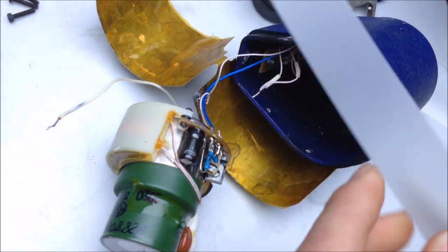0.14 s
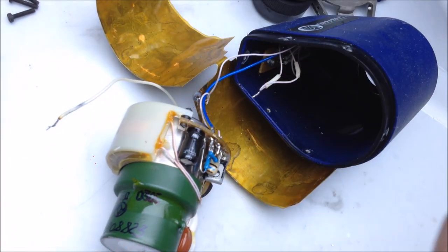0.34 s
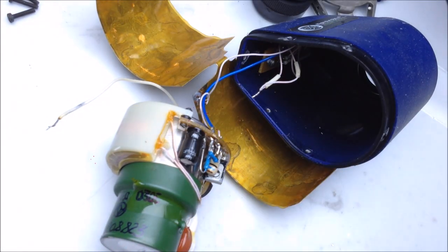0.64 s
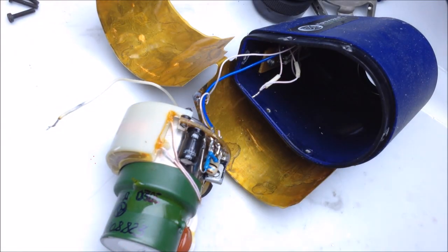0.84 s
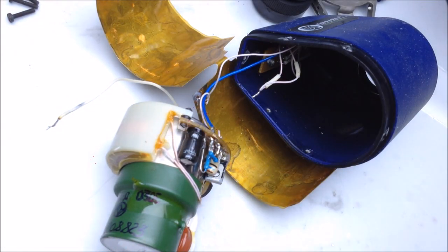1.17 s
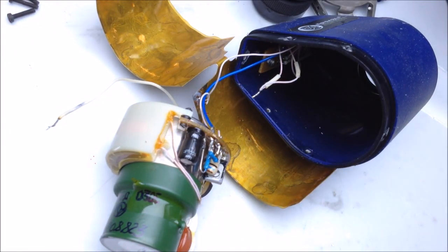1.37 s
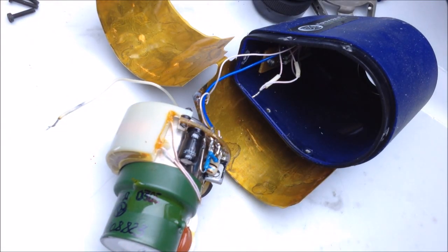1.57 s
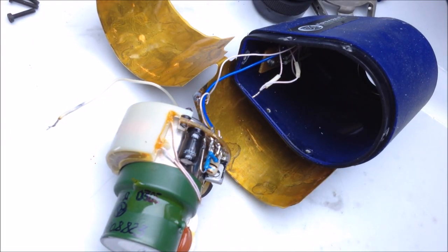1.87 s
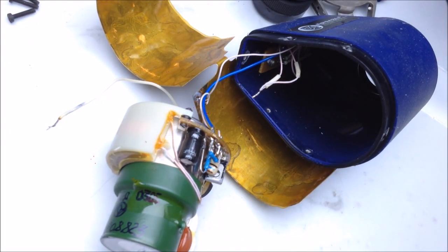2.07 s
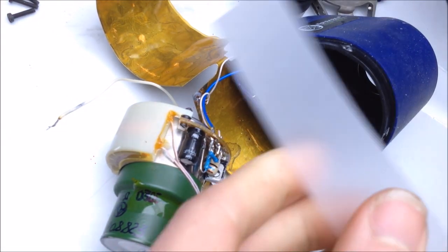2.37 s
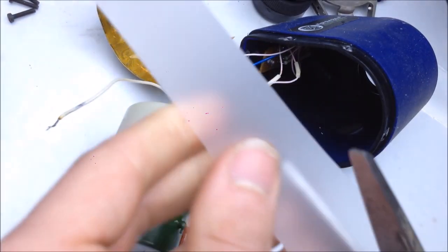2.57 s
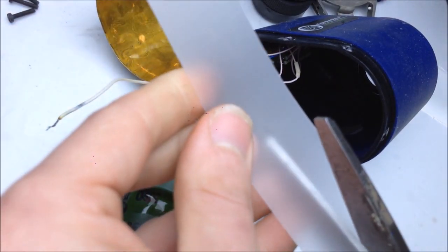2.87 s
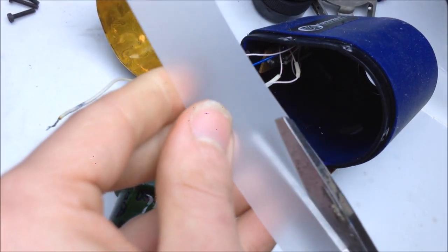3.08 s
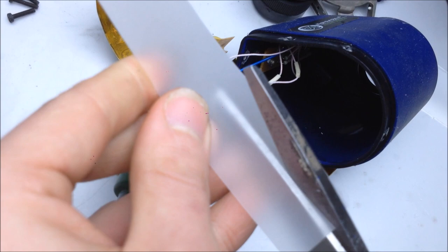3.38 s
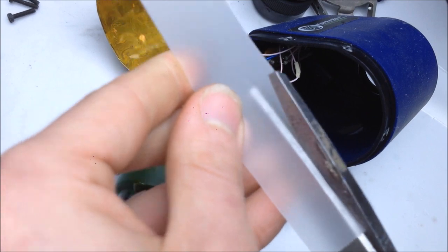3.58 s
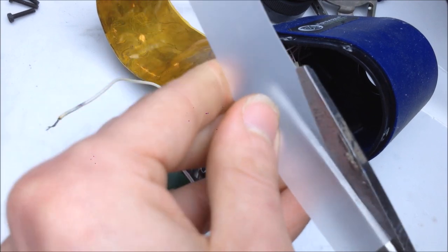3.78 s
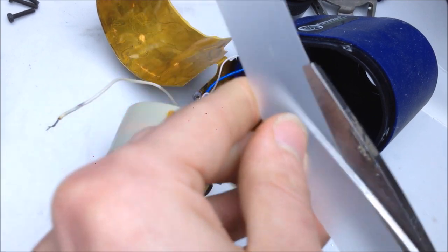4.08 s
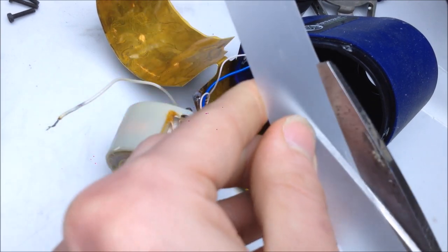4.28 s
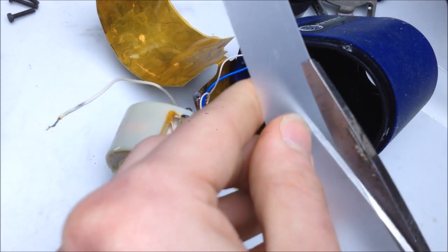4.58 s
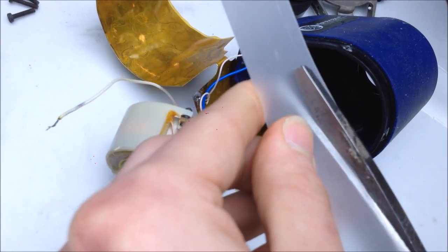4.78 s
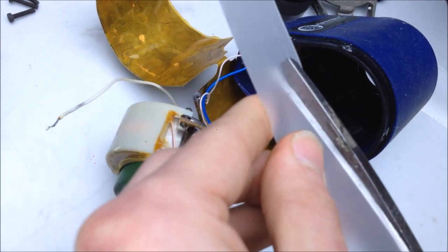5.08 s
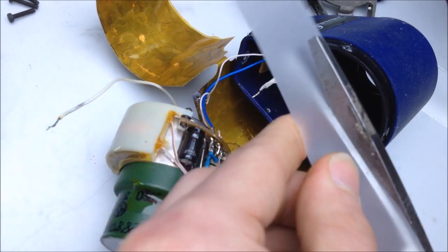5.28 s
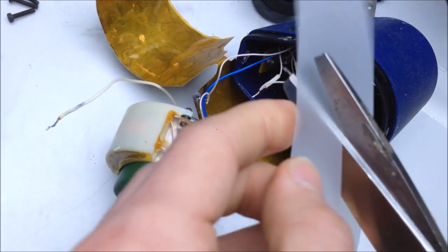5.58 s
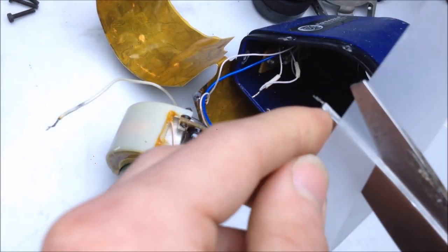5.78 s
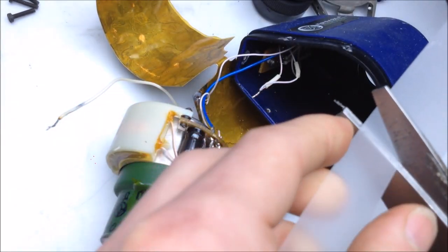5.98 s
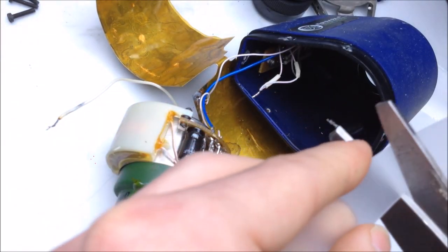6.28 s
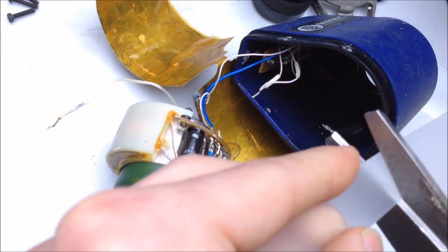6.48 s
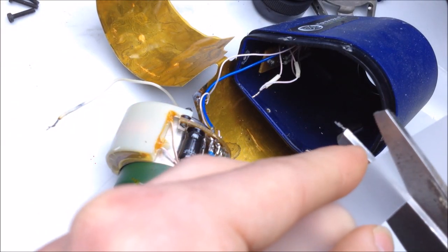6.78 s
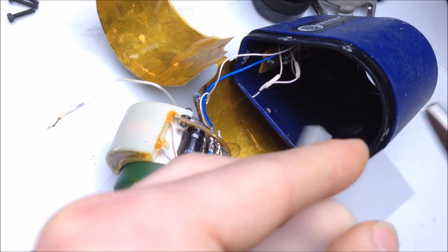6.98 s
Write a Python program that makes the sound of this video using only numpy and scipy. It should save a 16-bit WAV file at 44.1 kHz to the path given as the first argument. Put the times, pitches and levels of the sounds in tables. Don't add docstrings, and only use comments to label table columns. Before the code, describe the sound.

A tiny clipped snap, then over two seconds of quiet room with faint finger rustles, a soft fan drone and thin electrical whine. Scissors then crunch through stiff plastic in uneven clusters of bright dry cracks and gritty shear, with one hard snap near the end of the run. Light rustling follows, then a final burst of sharp snaps with a brief rough flutter. Close microphone over a workbench, dry.

```python
import sys
import numpy as np
from scipy import signal
from scipy.fft import rfft, irfft, next_fast_len
from scipy.io import wavfile
from scipy.ndimage import uniform_filter1d, map_coordinates

SR = 44100
rng = np.random.default_rng(int(sys.argv[2]) if len(sys.argv) > 2 else 0)


def gain_from_db(level_db):
    decades = np.asarray(level_db, float) / 20
    return 10 ** decades


def int16_out(signal):
    q = np.round(np.clip(np.atleast_2d(signal).T, -1, 1) * 32767)
    wavfile.write(sys.argv[1], SR, q.astype(np.int16))


N = 315030
TIME = np.arange(N) / SR
TOP_HZ = 15230

# f/Hz, width/Hz, level/dB
SHEET = [(425, 200, -9), (710, 54, 6), (845, 63, 5.5), (982, 200, 6), (1470, 640, -6.5)]
BLADES = [(2260, 750, -4.5), (2800, 410, 0.5), (4400, 360, -0.5), (5720, 380, -3), (6400, 690, -2.5),
          (7460, 720, -3), (8700, 1300, -8)]
EDGE = [(9320, 3200, -1), (11900, 500, -2), (12700, 880, -2), (13460, 2000, -6.5)]

# t/s, rms level/dB, sheet level/dB, edge level/dB,
# brightest f/Hz
SLIPS = [(0.0030, -35, -3, -1, 5100), (2.9859, -38, -0.5, 3, 3670), (3.0335, -35, 1, -2, 4030),
         (3.0690, -36, 0, -1.5, 4200), (3.0978, -25.5, 0, -5, 3960), (3.1298, -29.5, 0, -9, 4250),
         (3.3237, -30.5, 4, -33, 6040), (3.3438, -34, 1.5, -27.5, 4400),
         (3.3598, -29, -2.5, -24, 4400), (3.4790, -36, -0.5, -3, 4260), (3.5060, -26.5, -3, -6, 4330),
         (3.5358, -24, -5.5, -25, 4630), (3.5790, -27.5, -4.5, -11.5, 5470),
         (3.7484, -37.5, 3.5, -25, 2800), (3.9066, -35, 2.5, -1, 2150),
         (3.9303, -32.5, -3.5, -8, 5630), (3.9490, -31.5, -1, -4, 6940), (3.9737, -37, -16, -13, 1820),
         (3.9895, -35.5, -4.5, -5.5, 3800),
         (4.1293, -30, -8, -33, 2600), (4.1663, -33, 3.5, -23, 2800), (4.1947, -33, -7, -19.5, 6400),
               (4.2151, -31, -3, -21, 7100), (4.3266, -23, -8, -24.5, 7200), (4.3426, -40, -4, -16.5, 6340),
               (4.4280, -36, 5, -14.5, 6540), (4.6531, -34.5, -7, -4.5, 6400),
               (4.6649, -45.5, -11, -11, 6400), (4.68, -32.5, 2.5, -3.5, 8800),
               (4.7089, -36, 6, -4.5, 4700), (4.7244, -37, -1.5, -10, 4700), (4.7470, -33, -1, -1.5, 2640),
               (4.7673, -30, -6, -8, 4500), (4.9656, -36, -1, -27, 6350),
         (5.0570, -31, -4, -3.5, 2370), (5.0820, -29.5, 7.5, -7, 2340), (5.1065, -37.5, -3, -6.5, 4400),
             (5.143, -27.5, -2.5, -7, 4400), (5.1762, -34.5, -11, -1, 4500), (5.2990, -41, 4, -16, 4500),
             (5.3275, -26, -5, -8, 2900), (5.3805, -14.5, -7.5, -20.5, 4770), (5.7525, -45, 2, -2.5, 4640),
             (6.8, -35, -12.5, -9, 5690), (6.9270, -15, -17.5, -3, 4130), (6.9530, -21, -8, -1, 4350),
             (6.9745, -25, -7, -26, 8700), (7.0450, -34.5, -1, 2, 6000), (7.0677, -40.5, 2, -24, 1780),
             (7.0842, -38, -4, -3, 9100)]
CUTS = SLIPS


def columns(rows):
    return np.transpose(rows)[:, :, None]


def unit(x):
    return x / np.sqrt(np.mean(x ** 2) + 1e-20)


def energy(x):
    return np.linalg.norm(x, axis=1, keepdims=True)


def with_energy(x, db, size):
    return x * gain_from_db(db) / energy(x) * size


def with_peak(x, db):
    return x * gain_from_db(db) / np.abs(x).max(1, keepdims=True)


def along(points, hz):
    f, v = np.transpose(points)
    return np.interp(np.log(hz + 1), np.log(f + 1), v)


def gain(s, db):
    return uniform_filter1d(np.interp(TIME, s, gain_from_db(db), 0, 0), size=200)


def wobble(rate):
    coarse = np.arange(0, N + 16, 16)
    knots = rng.standard_normal(int(N * rate / SR) + 4)
    return np.interp(np.arange(N), coarse, map_coordinates(knots, [coarse * rate / SR]))


def filtered(x, response):
    m = next_fast_len(x.shape[-1] + 256)
    return irfft(rfft(x, m) * response(np.fft.rfftfreq(m, 1 / SR)), m)[..., :x.shape[-1]]


def bass_cut(x, corner_hz):
    return filtered(x, lambda f: (1j * f / (corner_hz + 1j * f)) ** 2)


def dulled(x, hz):
    return filtered(x, lambda f: 1 / (1 + 1.4j * f / hz - (f / hz) ** 2))


def bandpass(f, hz, width):
    return 1j * f * width / (hz * hz - f * f + 1j * f * width)


def spot(x, hz, width_hz):
    return filtered(x, lambda f: bandpass(f, hz, width_hz))


def resonate(x, modes, spread_db=0):
    hz, width, db = columns(modes)
    sign = (-1) ** np.arange(len(modes))
    spread = spread_db * rng.standard_normal((*x.shape[:-1], len(modes)))
    strength = sign * gain_from_db(db[:, 0] + spread)
    return filtered(x, lambda f: strength @ bandpass(f, hz, width))


def grit(shape, spiky_db):
    return rng.standard_normal(shape) * gain_from_db(spiky_db * np.minimum(rng.exponential(size=shape), 4))


def echoed(x, wet_db):
    # f/Hz, t60/s
    bench = [(250, 0.19), (800, 0.055), (2000, 0.067), (6000, 0.052), (14000, 0.1)]
    hz, t, z = signal.stft(rng.standard_normal(x.shape), SR, nperseg=128)
    decay = gain_from_db(-60 * t / along(bench, hz)[:, None])
    echo = signal.istft(z * decay, SR, nperseg=128)[1][:, :x.shape[1]]
    echo /= energy(echo)
    return x + gain_from_db(wet_db) * signal.fftconvolve(x, echo, axes=1)[:, :x.shape[1]]


def swells(s, rise, fall, spiky_db, wet_db, span, sudden):
    t = np.arange(round(span * SR)) / SR - span / 3
    swell = np.where(t < 0, np.exp(-.5 * np.abs(t / rise) ** sudden), np.exp(-.55 * t / fall))
    return echoed(grit(swell.shape, spiky_db) * swell, wet_db), energy(swell), s - span / 3


def placed(rows, s):
    at = np.round(s * SR).astype(int) + np.arange(rows.shape[1])
    inside = (at >= 0) & (at < N)
    return np.bincount(at[inside], rows[inside], N)


def slips():
    s, db, sheet_db, edge_db, hz = columns(CUTS)
    peak_s = s + .0025
    rise = .0026 * gain_from_db(0.41 * (-33 - db))
    fall = 0.003 * gain_from_db(.25 * np.minimum(-25 - db, 0))
    push, size, start = swells(peak_s, rise, fall, spiky_db=4.5, wet_db=-9.0, span=.105, sudden=3.5)
    steel = resonate(push, BLADES, spread_db=3.5) + gain_from_db(-6.0) * spot(push, hz, 700)
    steel = with_energy(dulled(steel, 10500), db, size)
    sheet = with_energy(resonate(push, SHEET, spread_db=3.0), db + sheet_db - 3.5, size)
    edge = with_energy(resonate(push, EDGE, spread_db=5), db + edge_db + 0.5, size)
    return placed(steel + sheet + edge, start)


def cracks():
    # t/s, peak level/dB, sheet level/dB, brightest f/Hz
    snaps = [(0.0012, -13.5, -11, 6400), (0.0056, -14, -9.5, 5100), (3.0300, -34.5, -1, 5500),
             (3.0400, -19, -6, 7660), (3.1096, -20, -13, 1900), (3.3098, -15, 0, 2440),
             (3.3237, -12, -12, 5970), (3.374, -13.5, 0, 5600), (3.4758, -24, -5, 4400),
             (3.5077, -14, -5, 2800), (3.5500, -17, -7, 4400), (3.7408, -20, 4, 2800),
             (4.1287, -10.5, -1.5, 2710), (4.1944, -10.5, -26, 6400), (4.2153, -14, -12, 7050),
             (4.3270, -7, -5, 7240), (4.3422, -15.5, -17, 6460), (4.7354, -21.5, -20, 9050),
             (4.7855, -29, -11, 4600), (5.0540, -19.5, -17, 5500), (5.1647, -22, -24, 9300),
             (5.3122, -27, -7.5, 4500), (6.7983, -10, -22, 6200), (6.9247, -9, -17, 4180),
             (6.9300, -6, -23.5, 2870), (6.954, -18, -11, 6840), (5.3817, -8, -5.5, 4400)]
    # t/s, peak level/dB, sheet level/dB, brightest f/Hz
    ticks = [(0.2335, -55, 12, 1800), (0.4640, -41.5, 5.5, 4500), (0.4880, -37, -2, 1800),
             (0.5030, -46, -2.5, 2600), (1.488, -47, -8, 1900), (2.5595, -32, -5, 6000),
             (2.8846, -33, -18, 4160), (2.9490, -47, 2, 4400), (3.3003, -41, -20.5, 6100),
             (3.4487, -28, -18, 5500), (3.7170, -49, -20.5, 5900), (4.4502, -32, -7, 6900),
             (4.4743, -37, -23, 5970), (4.6242, -42, 1, 4500), (4.8384, -36.5, -20, 4500),
             (5.0316, -32, -8, 4400), (5.4859, -36, -4, 4600), (5.5147, -34.5, -25, 4700),
             (5.9950, -39.5, 2, 1980)]
    openings = [(s, db + 11, sheet_db - 4.5, hz) for s, db, sheet_db, _, hz in CUTS]
    s, db, sheet_db, hz = columns(openings + snaps + ticks)
    t = np.arange(2560) / SR
    push = echoed(rng.standard_normal((len(s), len(t))) * np.exp(-t / .00008), wet_db=-6.5)
    cuts = np.array(CUTS)
    edge_db = cuts[np.abs(s - cuts[:, 0]).argmin(1), 3][:, None]
    steel = resonate(push, BLADES, spread_db=3.0) + gain_from_db(6.0) * spot(push, hz, 900)
    steel = with_peak(dulled(steel, 12000), db - 0.5)
    sheet = with_peak(resonate(push, SHEET, spread_db=4.0), db + sheet_db - 9.0)
    edge = with_peak(resonate(push, EDGE), db + edge_db - 3)
    return placed(steel + sheet + edge, s)


def splinters():
    # t/s, peak level/dB, brightest f/Hz
    dry_spikes = [(2.8849, -24, 8000), (2.9923, -27, 11800), (3.0338, -19, 4100), (3.0415, -26, 4200),
                  (3.0654, -29, 4200), (3.077, -29, 8700), (3.0975, -15, 4300), (3.1295, -17, 4400),
                  (3.3149, -14, 4400), (3.3187, -18, 2000), (3.3283, -21, 2200), (3.3368, -20, 5500),
                  (3.344, -14, 4400), (3.3489, -19, 4200), (3.3655, -22, 1700), (3.3765, -24, 1700),
                  (3.4802, -17, 2100), (3.5352, -21, 7300), (3.581, -14, 6300), (3.7445, -20, 1700),
                  (3.7486, -19, 2800), (3.7526, -21, 2400), (3.7644, -21, 2800), (3.7695, -25, 1700),
                  (3.7754, -22, 1700), (3.9069, -19, 13000), (3.9764, -27, 6700), (3.9868, -29, 6900),
                  (4.1593, -20, 1900), (4.1661, -21, 1900), (4.1702, -20, 1700), (4.1742, -21, 2500),
                  (4.1771, -22, 2400), (4.1839, -25, 2800), (4.2241, -30, 6800), (4.4359, -27, 6400),
                  (4.6548, -18, 6400), (4.6651, -24, 6500), (4.6793, -19, 6200), (4.6831, -19, 6200),
            (4.7075, -26, 6800), (4.7234, -20, 5900), (4.7454, -25, 6500), (4.7691, -17, 4500),
            (4.9269, -30, 1700), (4.9395, -25, 1700), (4.962, -24, 4500), (4.9712, -24, 6200),
            (4.9737, -24, 5700), (5.0578, -15, 2600), (5.069, -24, 1700), (5.0776, -25, 2400),
            (5.1037, -25, 2500), (5.148, -15, 2400), (5.1748, -25, 9000), (5.1778, -18, 10200),
            (5.3216, -25, 7500), (5.3432, -24, 4800), (5.3505, -30, 5300), (5.394, -21, 4500),
            (6.9335, -7, 3700), (6.9521, -8, 7500), (6.9541, -10, 6800), (6.96, -7, 4500),
            (6.9631, -8, 4300), (6.9736, -11, 8700), (6.9917, -18, 8900), (7.0456, -22, 7800)]
    # t/s, peak level/dB, f/Hz
    overtones = [(4.3264, -13, 2900), (4.3276, -15, 4500), (4.3268, -15, 700), (4.3281, -15, 8300),
                 (5.3775, -24, 6000), (5.3787, -22, 4500), (5.3808, -10, 2130), (5.3814, -2, 4470),
                 (5.382, -7, 7300), (5.3275, -14, 2700), (6.7983, -12, 2900), (6.7986, -11, 4150),
                 (6.7988, -24, 1070), (6.7983, -20, 13000), (6.9302, -7, 8500), (6.9317, -6, 4300),
                 (6.977, -7, 8340), (6.9271, -10, 12500), (6.9525, -14, 14000), (5.735, -44, 2400),
                 (3.867, -48, 9000), (4.875, -48, 9000), (1.716, -52, 11000), (1.725, -50, 9000),
                 (1.733, -52, 9000), (5.898, -44, 8000), (6.642, -50, 3000)]
    s, db, hz = columns(dry_spikes + overtones)
    t = np.arange(1536) / SR
    push = echoed(-np.exp(-t / .00003) * np.ones_like(s), wet_db=-9)
    spike = spot(push, hz, .2 * hz + 400) + gain_from_db(-12) * resonate(push, BLADES + EDGE, spread_db=3)
    return placed(with_peak(spike, db - 1.5), s - .0001)


def shear():
    # from t/s, to t/s, grit level at first/dB, at last/dB, sheet flex over grit/dB
    strokes = [(3.023, 3.143, -53.5, -62, 1), (3.474, 3.585, -60, -53, -1), (3.905, 3.991, -51, -49, -2),
               (3.312, 3.38, -32.5, -45.5, -2.5), (3.739, 3.773, -43, -36.5, -3),
               (4.145, 4.229, -44.5, -49, -0.8), (4.328, 4.352, -38.5, -43.5, -1.5),
               (4.410, 4.438, -47, -49, 2), (4.674, 4.781, -52.5, -43.5, -2), (4.919, 4.974, -43, -36.5, 0),
               (5.056, 5.106, -38.5, -39.5, -4), (5.145, 5.2, -42.5, -53.5, -2),
               (5.283, 5.362, -44, -43, -4), (6.957, 6.993, -25, -35, -9)]
    grind, flex = np.zeros(N), np.zeros(N)
    for a, b, first_db, last_db, flex_db in strokes:
        s = np.array([a - 0.0054, a, b, b + .014, b + 0.028, b + 0.056])
        db = np.array([first_db - 50, first_db, last_db, last_db - 10.5, last_db - 20.5, last_db - 50])
        grind += gain(s, db)
        flex += gain(s, db + flex_db)
    rough = grit(N, spiky_db=3) * gain_from_db(3 * wobble(350) + 2.5 * wobble(80))
    steel = unit(dulled(resonate(rough, BLADES), 10000)) + gain_from_db(-7.5) * unit(resonate(rough, EDGE))
    return gain_from_db(-1.0) * grind * steel + gain_from_db(1) * flex * unit(resonate(rough, SHEET))


def flutter():
    # t/s, f/Hz, rms level/dB
    path = [
        (6.923, 1450, -70),
        (6.927, 1400, -35),
        (6.948, 1200, -45),
        (6.956, 1120, -31),
        (6.972, 950, -39),
        (6.995, 880, -43),
        (7.03, 850, -66),
    ]
    s, hz, db = np.transpose(path)
    phase = 2 * np.pi * np.cumsum(np.interp(TIME, s, hz) * (1 + .07 * wobble(250))) / SR
    return gain_from_db(np.interp(TIME, s, db, -120, -120) + 3 + 4.5 * wobble(200)) * np.sin(phase)


def pings():
    # t/s, peak level/dB, f/Hz
    rings = [(2.886, -46, 11900), (2.949, -50, 11900), (2.9855, -34, 11900), (3.4795, -38, 12500),
             (3.906, -34, 13000), (4.651, -36, 12600), (6.799, -28, 3700), (5.381, -17, 2130),
             (5.382, -21, 856), (4.327, -16, 7240), (3.742, -26, 2800)]
    s, db, hz = columns(rings)
    t = np.arange(4096) / SR
    t60 = .045
    pair = np.sin(2 * np.pi * hz * t) + .6 * np.sin(2 * np.pi * 1.012 * hz * t)
    return placed(gain_from_db(db - 4 - 60 * t / t60) * pair * (1 - np.exp(-t / .0003)), s)


def handling():
    # t of peak/s, rms level/dB, rise/s, sheet level/dB
    touches = [(0.2023, -68, 0.022, 0), (0.495, -52, 0.021, -3), (0.5450, -63, 0.02, -6),
               (1.291, -56.5, 0.0051, -2), (1.5680, -63.5, 0.014, -18), (1.6400, -68.5, 0.049, -8),
               (1.726, -64, 0.007, -15), (1.92, -56, 0.0064, -19), (2.0270, -62.5, 0.0079, -13),
               (2.5100, -65, 0.034, 3.5), (2.5654, -60, 0.006, -2), (2.613, -55, 0.018, -5),
               (2.6580, -51.5, 0.014, -16), (2.7060, -52.5, 0.019, -12), (2.8900, -44.5, 0.0037, -2),
               (3.4539, -51, 0.002, -9), (4.527, -53.5, 0.016, 1), (4.5982, -58, 0.0089, 0.5),
               (4.6255, -53.5, 0.005, 3.5), (5.4890, -58, 0.014, 2.5), (5.5203, -62, 0.017, -11),
               (5.576, -47.5, .012, -4.5), (5.6280, -64, 0.012, 10.5), (5.6560, -46, 0.0098, -2.5),
               (5.762, -51, 0.01, 6), (5.8708, -52.5, 0.014, -0.5), (5.9725, -53.5, 0.014, -12),
               (6.1920, -61.5, 0.021, 9.5), (6.2159, -50, 0.012, -5), (6.2760, -53, 0.023, -3),
               (6.305, -58, 0.015, 3), (6.3900, -56, 0.0069, -4), (7.1340, -56, 0.0077, 6)]
    # f/Hz, width/Hz, level/dB
    skin = [(2370, 1040, 3.5), (4500, 870, 3.5), (7230, 4400, 0.5), (12950, 5300, -7.5)]
    s, db, rise, sheet_db = columns(touches)
    hz = 6000 * (0.0053 / rise) ** 0.35
    push, size, start = swells(s, rise, 0.89 * rise, spiky_db=4.5, wet_db=-8.5, span=0.23, sudden=2.1)
    rustle = spot(resonate(push, skin, spread_db=2.0), hz, 1.7 * hz)
    rustle = with_energy(rustle, db + 0.27, size)
    sheet = with_energy(resonate(push, SHEET, spread_db=0.5), db + sheet_db - 4.0, size)
    return placed(rustle + sheet, start) * gain_from_db(2.93 * wobble(150))


def thuds():
    # t/s, peak level/dB
    jolts = [
        (0.233, -53),
        (3.093, -50),
        (3.312, -31),
        (3.349, -42),
        (3.506, -46),
        (3.739, -36.5),
        (4.125, -39),
        (4.322, -44),
        (4.945, -38),
        (5.374, -39),
    ]
    s, db = columns(jolts)
    t = np.arange(6144) / SR
    shake = rng.standard_normal((len(s), len(t))) * np.exp(-t / 0.022)
    shake = spot(spot(shake, 250, 150), 250, 200)
    return placed(with_peak(shake, db - 2.5), s)


def walls(x):
    t = np.arange(8192) / SR
    tail = rng.standard_normal(len(t)) * gain_from_db(-60 * t / .15)
    return gain_from_db(-22.5) * signal.fftconvolve(x, tail / np.linalg.norm(tail))[:N]


def room():
    # f/Hz, level per Hz/dB
    air_colour = [(15, -74.5), (25, -44), (173, -2.5), (209, -9), (378, -11.5), (410, -13.5), (762, -15.5),
                  (1020, -15), (1450, -15.5), (1620, -16), (3440, -19.5), (8130, -27.5), (15500, -27.5)]
    # t/s, drone level/dB
    fan = [
        (0, -82),
        (.95, -74.5),
        (1.31, -68),
        (1.77, -70.5),
        (5.75, -77),
        (5.95, -72.5),
        (6.54, -79),
        (7.14, -74),
    ]
    # f/Hz, width/Hz, level/dB
    drone_modes = [(184, 12, -1.5), (250, 15, 2), (335, 40, -8.5)]
    # f/Hz, rms level/dB
    hums = [(382.5, -76), (764, -81.5), (1152, -83.5), (1469, -67), (1879, -85), (3553, -81)]
    air = unit(filtered(rng.standard_normal(N), lambda f: gain_from_db(along(air_colour, f))))
    air *= gain_from_db(-65 + 0.75 * wobble(1.9))
    drone = unit(resonate(rng.standard_normal(N), drone_modes))
    drone *= gain_from_db(3.0 + 3.3 * wobble(9)) * gain(*np.transpose(fan))
    tones = 0
    for hz, db in hums:
        drift = np.cumsum(.0008 * wobble(3)) / SR
        tones = tones + gain_from_db(db + 3 + .8 * wobble(4.7)) * np.sin(2 * np.pi * hz * (TIME + drift))
    return air + drone + tones


def scene():
    near = slips() + cracks() + splinters() + flutter() + pings() + shear() + handling()
    near = bass_cut(near, 150)
    near = np.where(TIME < 6.7, near, bass_cut(near, 450))
    return (near + walls(near) + thuds() + room())[None]


def thin_out(x, s, length, db, soft, bands):
    at = np.arange(round((s - length / 2) * SR), round((s + length / 2) * SR))
    fade = np.sqrt(signal.windows.tukey(len(at), soft))
    f = np.fft.rfftfreq(len(at), 1 / SR)
    hz, width = columns(bands)
    kept = np.maximum(gain_from_db(db) * (np.abs(f - hz) < width / 2).any(0), gain_from_db(-22))
    blur = np.exp(1j * .8 * rng.standard_normal(len(f)))
    piece = fade * x[:, at]
    x[:, at] += fade * (irfft(rfft(piece) * kept * blur, len(at)) - piece)


def dropouts(x):
    # centre t/s, length/s, level of surviving bands/dB
    after_bursts = [
        (4.358, .03, 4),
        (4.416, .04, 3),
        (6.983, .036, 4.5),
    ]
    # f/Hz, width/Hz
    survivors = [
        [(150, 500), (1200, 1400), (2490, 300), (4550, 300), (5510, 300), (6400, 900), (7200, 500),
         (10900, 300)],
        [(150, 500), (845, 400), (1580, 300), (2300, 300), (2910, 300), (6500, 1000), (8400, 300)],
        [(877, 400), (2490, 400), (4140, 400), (4750, 300), (6100, 500), (7370, 400), (8500, 900), (9330, 300),
         (12900, 300), (13700, 300), (15000, 400)],
    ]
    # centre t/s, length/s, whole below f/Hz
    gaps = [(1.093, .026, 4000), (1.648, .022, 5000), (1.71, .014, 4700), (1.986, .02, 2700),
            (2.094, .03, 3000), (2.875, .012, 4000), (3.844, .032, 4200), (4.038, .022, 2200),
            (6.062, .024, 2000), (6.532, .03, 2000)]
    out = x.copy()
    for (s, length, db), bands in zip(after_bursts, survivors):
        thin_out(out, s, length, db, .6, bands)
    for s, length, top in gaps:
        stray = [(hz, 300) for hz in np.arange(top, TOP_HZ, 300) if rng.uniform() < .2]
        thin_out(out, s, length, 0, 1, [(0, 2 * top)] + stray)
    return out


def top_cut(x):
    return signal.sosfilt(signal.butter(12, 16560, fs=SR, output="sos"), x)


def record(dry):
    mix = filtered(dry, lambda f: gain_from_db(-33 * np.clip((f - TOP_HZ) / 200, 0, 1)))
    mix = dropouts(mix)
    return top_cut(mix)


dry = scene()
out = record(dry)
int16_out(out)
```